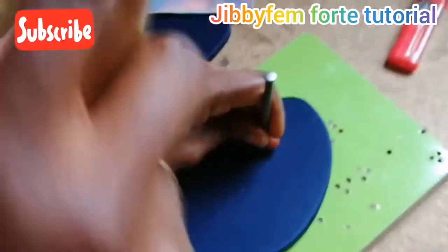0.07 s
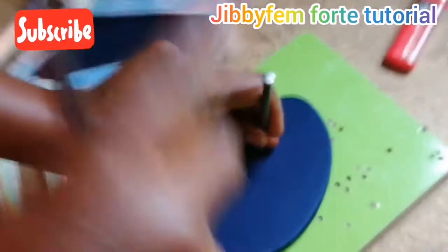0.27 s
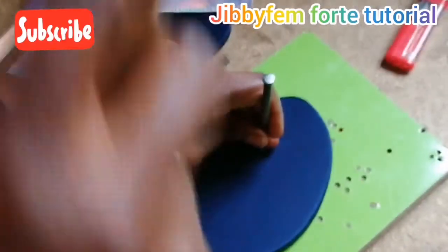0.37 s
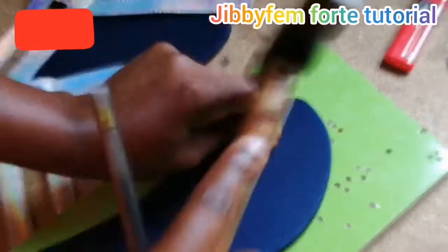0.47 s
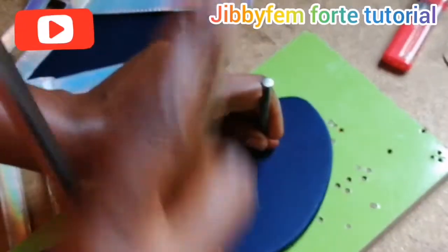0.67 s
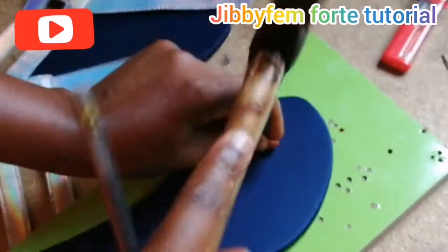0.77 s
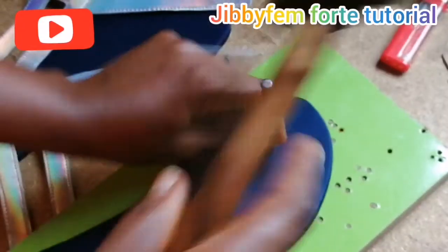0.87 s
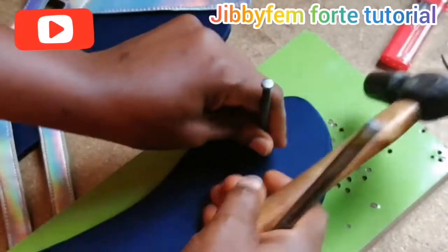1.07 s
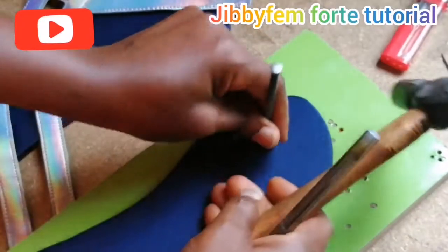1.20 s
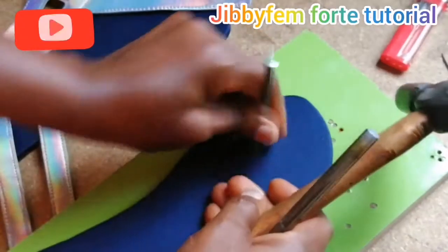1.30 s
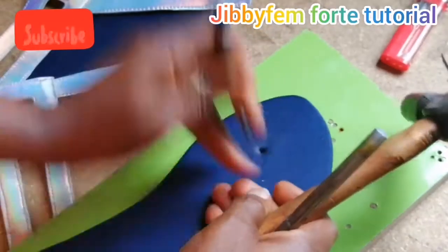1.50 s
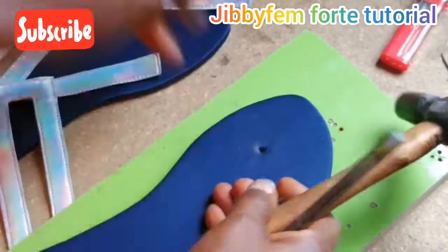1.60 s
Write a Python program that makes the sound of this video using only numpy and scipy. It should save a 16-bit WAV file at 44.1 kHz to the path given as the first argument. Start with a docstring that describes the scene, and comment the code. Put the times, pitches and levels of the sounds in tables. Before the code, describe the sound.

A hammer hits a steel punch three times in quick, even succession, driving it through foam. Each sharp knock echoes in a hard room. Faint knocks, ticks and a brief rustle follow, all close to the microphone.

```python
"""Hammering a hole punch through foam.

A hammer drives a steel punch through foam on a cutting mat, close to a phone in a hard, echoing room.
Each blow is a few milliseconds of crushing contact that rings punch and mat; the room answers with a
noise tail and standing waves. Then the tools are shifted: knocks, ticks and a rustle over a faint hush."""
import sys
import numpy as np
from scipy import signal
from scipy.fft import rfft, irfft, next_fast_len
from scipy.io import wavfile

SR = 44100
rng = np.random.default_rng(int(sys.argv[2]) if len(sys.argv) > 2 else 0)


def generate_wav(signal):
    """Clip the signal to [-1, 1] and save it as 16-bit WAV at the path in sys.argv[1]."""
    frames = np.transpose(np.atleast_2d(signal))
    scaled = np.clip(frames, -1, 1) * 32767
    pcm = np.round(scaled).astype(np.int16)
    wavfile.write(sys.argv[1], SR, pcm)


N = 72765
PREROLL_SAMPLES = SR // 8

# Hammer blows, the first just before the start. Each row: start in seconds, close level in dB,
# thump re close level in dB, tail trim in dB, boom trim in dB, then a gain in dB per TREBLE_BANDS row.
BLOWS = [(-.085, -21, -7, -6, 0, -5, 1.5, 7, 9), (0.2013, -13, -20.5, -0.5, 1.5, 1, -4.5, -3, -3),
         (0.4883, -14.5, -12, 0.5, 3, 1.2, -5.5, 3, 4.5), (0.7658, -15, -9.5, 0, 0.22, 0, 1.5, -9.5, 0)]
# Bands each blow excites differently. Each row: centre in Hz, width in Hz.
TREBLE_BANDS = [(5900, 870), (7750, 1200), (9350, 720), (14800, 1000)]
# Modes of punch, hammer head and mat. Each row: frequency in Hz, level in dB, t60 in seconds.
PUNCH_MODES = [(380, -4.5, 0.018), (517, -3, 0.024), (1130, -6.5, 0.04), (1451, -6, 0.029),
               (2060, -7, 0.012), (2863, -1.5, 0.018), (3226, 8, 0.0096), (4640, -20, 0.03),
               (5760, -6.5, 0.016), (6020, -20.5, .02), (8860, -3, 0.016), (14850, -3, 0.012)]
# Standing waves of room and bench. Each row: frequency in Hz, level in dB, t60 in seconds.
BOOM_MODES = [(107.03, -1.5, 0.76), (160.06, 1.5, 0.56), (200.5, 0, 0.17), (242, -14, 0.57),
              (296.6, 5, 0.26), (323.5, -7, 0.76), (356.6, -11.5, 1.2), (485.5, -17, 1.1)]
# Noise spectra of contact, room tail, hush and rustle. Each row: frequency in Hz, level in dB.
CRUNCH_SPECTRUM = [(150, 2), (600, -2.5), (1500, -6.5), (2400, -2.5), (3400, -6), (4200, -11.5),
                   (7000, -7.5), (12000, -11.5), (15500, -32)]
ROOM_SPECTRUM = [(25, -23.5), (70, -8.5), (300, 0), (550, -2.5), (1000, -10), (2000, -12.5), (3200, -9),
                 (4000, -16), (5300, -16.5), (5950, -12.5), (6500, -15), (7900, -17), (9500, -13.5),
                 (11500, -20), (13900, -31), (14400, -18.5), (15000, -15), (15400, -58)]
HUSH_SPECTRUM = [(25, -3), (150, -2), (460, -14), (3200, -23), (5700, -31.5), (11000, -30.5), (15000, -39),
                 (15700, -62)]
RUSTLE_SPECTRUM = [(250, 13.5), (2000, -4), (5300, -2.5), (7500, -5), (10000, -2), (15000, -12.5),
                   (15700, -44.5)]
# Room decay. Each row: frequency in Hz, t60 in seconds.
ROOM_DECAY = [(60, 1), (160, 0.83), (420, 0.75), (1100, 0.83), (2900, 0.74), (7700, 0.62), (14000, 0.41)]
# Stereo image of the room. Each row: frequency in Hz, left-right correlation.
ROOM_CORRELATION = [(60, 0.77), (180, 1), (550, 0.27), (1650, -0.11), (4970, 0.0083), (15000, 0.18)]
# Balance of a close source. Each row: frequency in Hz, left minus right in dB.
CLOSE_BALANCE = [(150, 0.5), (530, 9.5), (1120, 0.5), (1460, -5), (2000, -1.5), (3200, -2.5), (12000, 1)]
# Phase of a close source. Each row: frequency in Hz, left lead in radians.
CLOSE_LEAD = [(400, 0.84), (1120, -1.5), (1460, 0), (2000, 0.5), (2650, -1.9), (3300, 0.5), (4670, -2),
              (9000, 0.5), (15000, -1.5)]
# Bench knocks. Each row: start in seconds, level in dB, pitch in Hz, t60 in seconds, boom level in dB.
KNOCKS = [(1.2592, -39, 420, 0.063, -61.5), (1.2574, -39, 1570, 0.012, -80), (1.258, -60, 94, 0.85, -84),
          (1.2, -47.5, 100.9, 0.44, -62), (1.639, -52, 1340, 0.013, -85)]
# Tool and mat ticks. Each row: start in seconds, level in dB, centre in Hz, width in Hz, t60 in seconds.
TICKS = [(1.21, -58, 11000, 11000, 0.015), (1.2125, -62, 3200, 900, 0.011), (1.346, -52, 270, 220, 0.15),
         (1.2575, -56, 5250, 600, 0.011), (1.3455, -46.5, 1406, 2200, 0.041),
         (1.347, -63, 9600, 7900, 0.016), (1.357, -58.5, 4400, 3600, 0.016),
         (1.639, -51.5, 4900, 1400, 0.0127), (1.6377, -57, 12000, 11000, 0.018)]
# Rustle envelope. Each row: time in seconds, level in dB.
RUSTLE_ENVELOPE = [(1.324, -89), (1.347, -58), (1.37, -62), (1.439, -67), (1.479, -74.5), (1.52, -91.5)]
# Microphone port resonances, left then right. Each row: centre in Hz, width in Hz, boost in dB.
PORT_RESONANCES = [(9270, 1100, 10), (5560, 1250, 14.5)]

SPLIT = np.array([[.5], [-.5]])  # half of a difference to each channel


def amp(db):
    return 10 ** (np.asarray(db) / 20)


def decay(t, t60_s):
    return amp(-60 * t / t60_s)


def unit_rms(x):
    return x / np.sqrt(np.mean(x ** 2) + 1e-20)


def curve_at(points, hz):
    """Interpolates (Hz, value) rows on a log axis."""
    f, values = np.transpose(points)
    return np.interp(np.log(hz + 1), np.log(f + 1), values)


def peak(f, hz, width_hz):
    return 1 / (1 + ((f - hz) / (width_hz / 2)) ** 2)


def filtered(x, response):
    """Applies a complex response, given as a function of Hz."""
    size = next_fast_len(x.shape[-1] + 8192)
    return irfft(rfft(x, size) * response(np.fft.rfftfreq(size, 1 / SR)), size)[..., :x.shape[-1]]


def add(out, start_s, x):
    """Mixes x into a buffer that has pre-roll."""
    i = round(start_s * SR) + PREROLL_SAMPLES
    part = out[:, i:i + x.shape[-1]]
    part += x[..., :part.shape[-1]]


def stereo_noise(n, spectrum, correlation):
    """Shaped noise, rms 1."""
    def response(hz):
        angle = np.arccos(np.clip(curve_at(correlation, hz), -1, 1)) / 2
        return amp(curve_at(spectrum, hz)) * [np.cos(angle), np.sin(angle)]
    mid, side = filtered(rng.standard_normal((2, n)), response)
    return unit_rms(np.array([mid + side, mid - side]))


def band_noise(n, hz, width_hz):
    return unit_rms(filtered(rng.standard_normal((2, n)), lambda f: peak(f, hz, width_hz)))


def ring(modes, t, scatter_db, rise_per_t60=1e-4):
    """Damped modes with scattered levels and random phases."""
    out = np.zeros(len(t))
    for hz, db, t60_s in modes:
        level = amp(db - scatter_db * rng.normal())
        rise = 1 - np.exp(-t / (rise_per_t60 * t60_s))
        out += level * rise * decay(t, t60_s) * np.sin(2 * np.pi * (hz * t + rng.random()))
    return out


def punch_strike(t, contact_s=0.0038, rise_s=0.0006, crunch_db=-5.5):
    """Crushing contact rings punch and mat; the close sound falls unevenly on the two ports."""
    envelope = amp(crunch_db) * decay(np.maximum(t - contact_s, 0), t60_s=0.013)
    crunch = envelope * stereo_noise(len(t), CRUNCH_SPECTRUM, correlation=[(100, 0.094)])
    ringing = ring(PUNCH_MODES, t, scatter_db=1.5, rise_per_t60=0.13)
    strike = (1 - np.exp(-t / rise_s)) * (crunch + ringing)
    return filtered(strike, lambda hz: amp(SPLIT * curve_at(CLOSE_BALANCE, hz))
                    * np.exp(1j * SPLIT * curve_at(CLOSE_LEAD, hz)))


def thump(t, hz=70.5, rise_s=0.00098, balance_db=-5, left_lead_rad=-1.1):
    """Low damped sine under a blow, louder on the right."""
    envelope = np.minimum(t / rise_s, 1) * decay(t, t60_s=0.057)
    return amp(balance_db * SPLIT) * envelope * np.sin(2 * np.pi * hz * t + left_lead_rad * SPLIT)


def room_tail(t, delay_s=0.00363, rise_s=0.005, early_db=7):
    """Reverberation: noise with a strong early part, each frequency dying at its own rate."""
    hz, frame_s, bins = signal.stft(stereo_noise(len(t), ROOM_SPECTRUM, ROOM_CORRELATION), SR, nperseg=512)
    bins *= decay(frame_s, curve_at(ROOM_DECAY, hz)[:, None])
    _, tail = signal.istft(bins, SR, nperseg=512)
    rise = 1 - np.exp(-np.maximum(t - delay_s, 0) / rise_s)
    early = amp(early_db) * decay(t, t60_s=0.11)
    return rise * (1 + early) * tail[:, :len(t)]


def boom(t, rise_s=0.046, detune_hz=4.5, beat_db=-7.5, side_db=-15.5):
    """Standing waves of room and bench, each beating with a close neighbour."""
    neighbours = [(hz + detune_hz * rng.normal(), db, t60_s) for hz, db, t60_s in BOOM_MODES]
    mid = ring(BOOM_MODES, t, scatter_db=0.5) + amp(beat_db) * ring(neighbours, t, scatter_db=1.5)
    side = amp(side_db) * ring(neighbours, t, scatter_db=0.5)
    return (1 - np.exp(-t / rise_s)) * np.array([mid + side, mid - side])


def hammer(tail_db=-33, boom_db=-37):
    """Each blow strikes the punch, thumps and excites the room, with its own treble colour."""
    out = np.zeros((2, N + PREROLL_SAMPLES))
    t = np.arange(SR) / SR
    close_t = t[:SR // 10]
    for start_s, close_db, thump_db, tail_trim_db, boom_trim_db, *treble_db in BLOWS:
        close = amp(close_db) * (punch_strike(close_t) + amp(thump_db) * thump(close_t))
        blow = amp(tail_db + tail_trim_db) * room_tail(t)
        blow[:, :len(close_t)] += close
        treble = lambda f: amp(sum(db * peak(f, *band) for db, band in zip(treble_db, TREBLE_BANDS)))
        add(out, start_s, filtered(blow, treble) + amp(boom_db + boom_trim_db) * boom(t))
    return out


def hush(level_db=-71.5):
    """Steady, mostly low background noise."""
    return amp(level_db) * stereo_noise(N, HUSH_SPECTRUM, ROOM_CORRELATION)


def knocks(rise_s=0.00079, roughness=0.4, tail_db=-16.5):
    """Rough, dull rings with a noise tail; each wakes the bench."""
    out = np.zeros((2, N + PREROLL_SAMPLES))
    t = np.arange(SR // 2) / SR
    for start_s, db, hz, t60_s, boom_db in KNOCKS:
        grit = roughness * band_noise(len(t), hz, width_hz=0.68 * hz)[0]
        body = decay(t, t60_s) * (np.sin(2 * np.pi * hz * t) + grit)
        tail = amp(tail_db) * decay(t, t60_s=0.41) * band_noise(len(t), hz, width_hz=hz / 2)
        knock = amp(db) * np.minimum(t / rise_s, 1) * (body + tail)
        add(out, start_s, knock + amp(boom_db) * boom(t))
    return out


def ticks(room_db=-24.5, room_t60_s=0.49):
    """Tools and mat tick: short band-noise bursts with a faint room tail."""
    out = np.zeros((2, N + PREROLL_SAMPLES))
    t = np.arange(SR // 2) / SR
    for start_s, db, hz, width_hz, t60_s in TICKS:
        envelope = decay(t, t60_s) + amp(room_db) * decay(t, room_t60_s)
        add(out, start_s, amp(db) * envelope * band_noise(len(t), hz, width_hz))
    return out


def rustle():
    """A hand brushes over the foam: one swell of noise."""
    times_s, db = np.transpose(RUSTLE_ENVELOPE)
    envelope = amp(np.interp(np.arange(N) / SR, times_s, db, left=-120, right=-120))
    return envelope * stereo_noise(N, RUSTLE_SPECTRUM, correlation=[(100, 0.062)])


def scene():
    impacts = hammer() + knocks() + ticks()
    return impacts[:, PREROLL_SAMPLES:] + hush() + rustle()


def record(dry, ceiling=0.5, hardness=3, cutoff_hz=16800):
    """Cavity resonance of each port, soft saturation, band limit."""
    def bell(f, hz, width_hz, db):
        damping = 1j * f * width_hz
        return 1 + (amp(db) - 1) * damping / (hz ** 2 - f ** 2 + damping)

    def ports(f):
        left, right = (bell(f, *resonance) for resonance in PORT_RESONANCES)
        right_dip = bell(f, hz=9460, width_hz=6500, db=-10)
        return np.array([left, right * right_dip])

    x = filtered(dry, ports)
    saturated = x / (1 + np.abs(x / ceiling) ** hardness) ** (1 / hardness)
    return filtered(saturated, lambda f: f < cutoff_hz)


dry = scene()
out = record(dry)
generate_wav(out)
```